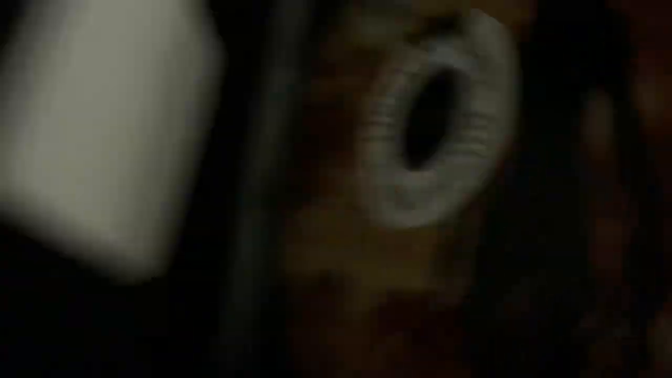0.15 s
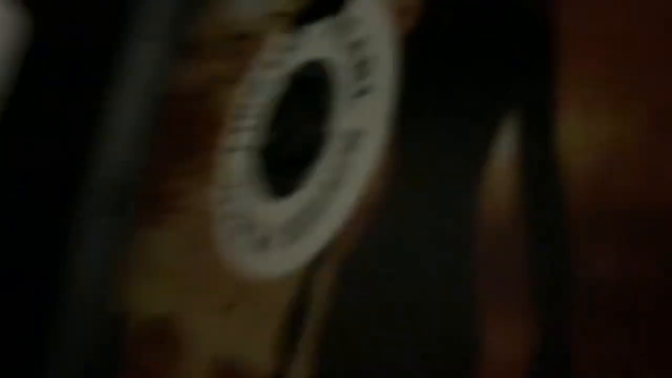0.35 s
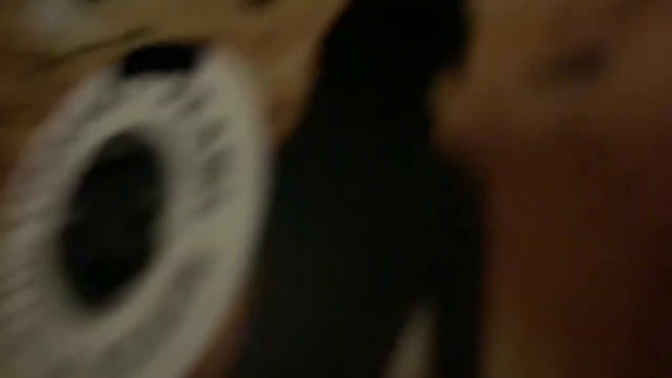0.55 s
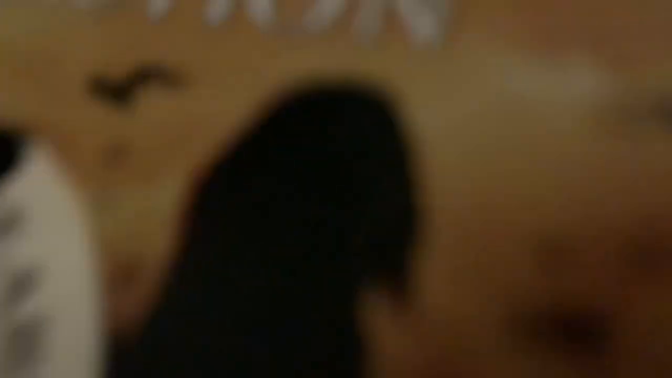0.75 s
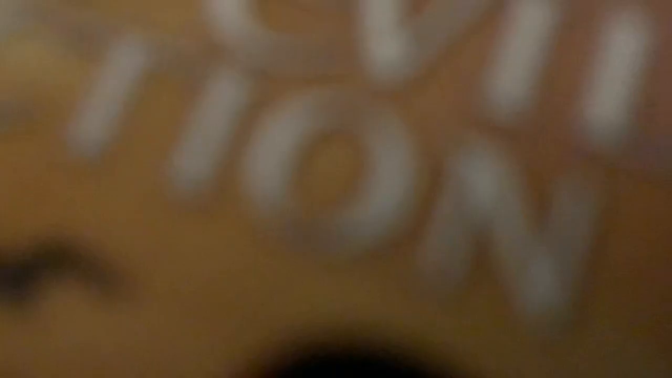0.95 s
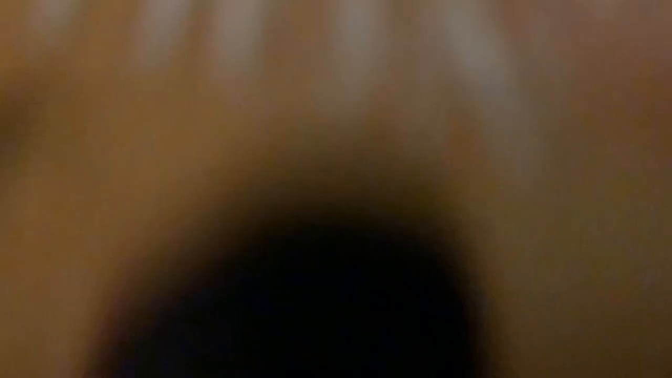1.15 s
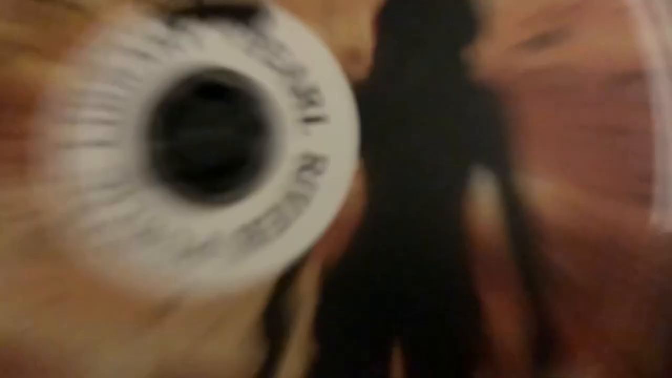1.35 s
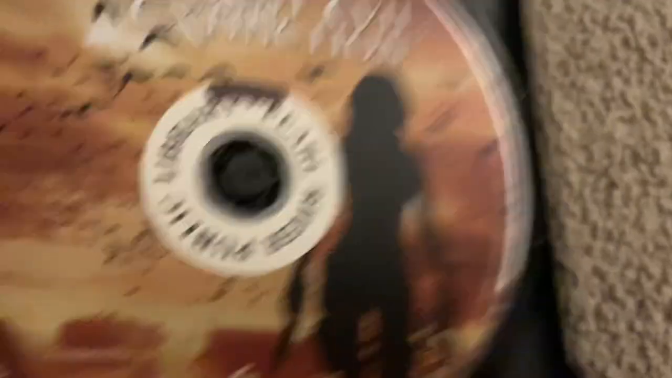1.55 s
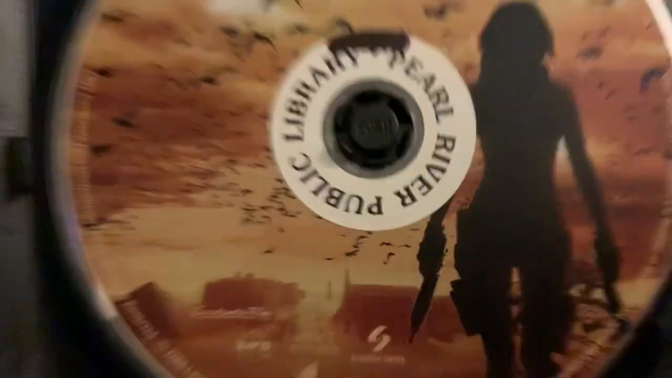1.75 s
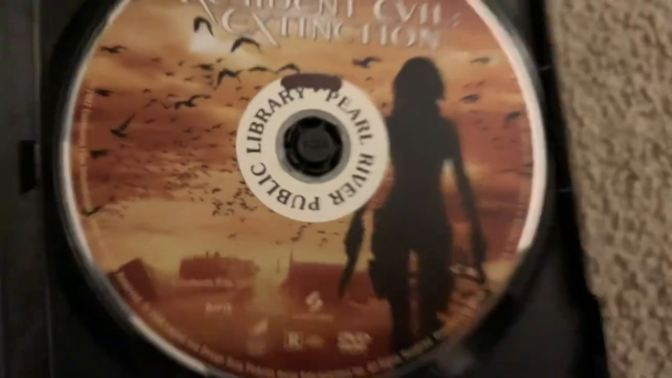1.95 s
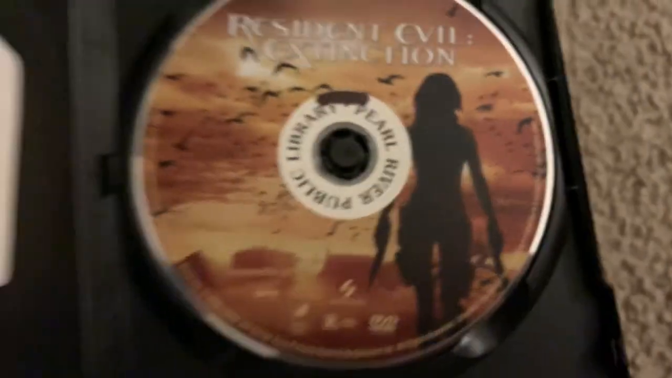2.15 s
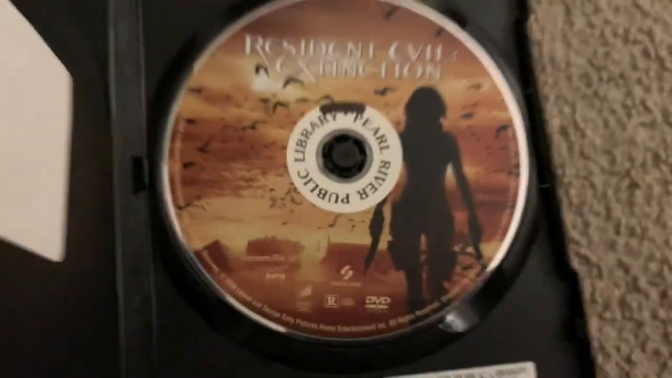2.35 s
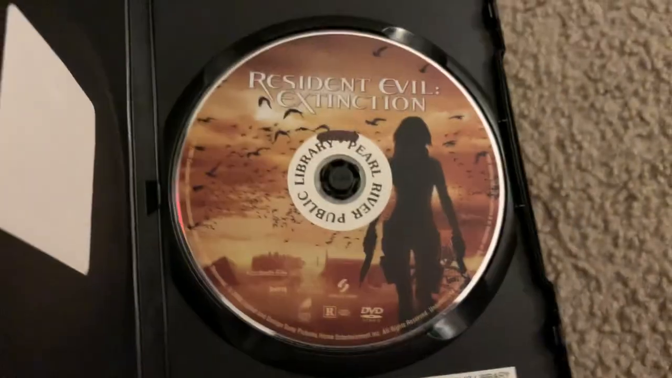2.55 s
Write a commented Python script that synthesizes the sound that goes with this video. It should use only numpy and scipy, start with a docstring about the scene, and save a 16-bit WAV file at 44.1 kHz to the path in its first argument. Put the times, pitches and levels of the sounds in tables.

```python
"""A grainy rub and a light clack open the take, right at the microphone in a small quiet room.
A plastic disc case lets its catch go: a run of clacks, noise bursts that ring the modes of the shell,
with soft thumps, short falling sines, and a brief tail from the room, decaying noise and one held note.
Then fingers shift their grip: bumps, light damped ticks and rubs of stick-slip noise.
Behind it all, steady noise makes the low rumble of the room."""
import sys
import numpy as np
from scipy import signal
from scipy.fft import rfft, irfft, next_fast_len
from scipy.io import wavfile

SR = 44100
rng = np.random.default_rng(int(sys.argv[2]) if len(sys.argv) > 2 else 0)


def bounce(signal):
    """Save signal as a 16-bit WAV file at the path given by the first command-line argument."""
    frames = np.transpose(np.atleast_2d(signal))
    limited = np.clip(frames, -1, 1)
    pcm = np.round(limited * 32767).astype(np.int16)
    wavfile.write(sys.argv[1], SR, pcm)


N = 114660  # 2.6 s
TIME = np.arange(N) / SR
BASS_HZ, MIDDLE_HZ, TREBLE_HZ = 450, 2370, 10800  # where the tone of a contact is set
ATTACK_S = 0.00057  # onset of clacks and ticks


def from_db(db):
    """Decibels to gain."""
    return 10 ** (np.asarray(db) / 20)


def at_hz(points, hz):
    """Read (frequency [Hz], value) points on a log-frequency axis."""
    points = np.array(points)
    return np.interp(np.log(hz + 1), np.log(points[:, 0]), points[:, 1])


def add(out, sound, s):
    """Mix a sound in at time s; what falls before the start or after the end is cut."""
    start = int(s * SR)
    sound = sound[..., max(-start, 0):]
    start = max(start, 0)
    out[..., start:start + sound.shape[-1]] += sound[..., :N - start]


def noise(spectra, likeness, size, balance=None):
    """Stereo random-phase noise with the summed spectra, as alike left and right as the likeness says."""
    hz = np.arange(size // 2 + 1) * SR / size
    mid, side = np.exp(2j * np.pi * rng.random((2, len(hz)))) * np.sqrt(size / 2)
    alike = np.clip(at_hz(likeness, hz), -1, 1)
    left_right = np.array([[1], [-1]])
    db = sum(at_hz(points, hz) for points in spectra)
    if balance is not None:
        db = db + left_right * at_hz(balance, hz) / 2
    stereo = np.sqrt(1 + alike) * mid + left_right * np.sqrt(1 - alike) * side
    return irfft(from_db(db) * stereo, size)


def tone(level_db, bass_db, treble_db):
    """Spectrum of one contact: its level, with more or less bass and treble."""
    return [(BASS_HZ, level_db + bass_db), (MIDDLE_HZ, level_db), (TREBLE_HZ, level_db + treble_db)]


def stick_slip(t, grain, slip_s):
    """Uneven force of a surface that catches and lets go, with a new random strength every slip."""
    force = np.interp(t / slip_s, np.arange(len(t)), rng.standard_normal(len(t)))
    return np.exp(grain * force - grain ** 2)


def resonance(x, hz, width_hz):
    """Two-pole resonance with gain 1 on top."""
    r = np.exp(-np.pi * width_hz / SR)
    feedback = [1, -2 * r * np.cos(2 * np.pi * hz / SR), r * r]
    return signal.lfilter(np.array([1, 0, -1]) * (1 - r * r) / 2, feedback, x + 1e-18)


def ringing(x, modes, spread_db=0):
    """A sound together with the modes that it rings, each a little stronger or weaker by chance."""
    out = x
    for (hz, width_hz, db), chance in zip(modes, rng.standard_normal(len(modes))):
        out = out + from_db(db + spread_db * chance) * resonance(x, hz, width_hz)
    return out


# Clacks of the catch, close up: (time [s], relative level [dB], bass [dB], treble [dB], contact t60 [s])
CLACK_EVENTS = [(0.002, -18, -10.5, -11.5, 0.059), (0.0695, -31, -4, -12.5, 0.045),
                (0.161, -36, 10, -8, 0.0088), (0.2254, -10.5, 10.5, -8.5, 0.11), (0.2337, 4.5, 5, 5, 0.024),
                (0.2372, -1.5, -3.5, -2, 0.028), (0.2412, 2, -1.5, -4.5, 0.024),
                (0.253, -2, -7.5, -21.5, .028), (0.2771, -5, -16.5, -1.5, 0.045),
                (0.283, -9, -2, -3.5, 0.036), (0.2911, -14, 8.5, -13, 0.035), (0.2972, -3.5, 1.5, 8, 0.03),
                (0.3028, 2, 1, 2, 0.014), (0.32, -20.5, -8.5, -7.5, 0.028), (0.3266, -6.5, -3, -19.5, .02),
                (0.3314, -4.5, -1.5, -3.5, 0.024), (0.339, -23.5, -14, -8, 0.073)]
# Colour of the shell before each clack's own tone: (frequency [Hz], level [dB per Hz])
SHELL_COLOUR = [(25, -50), (60, -22.5), (170, -0.5), (300, -1), (480, -9.5), (800, -11), (1200, -21),
                (1800, -19), (2600, -12.5), (3400, -23.5), (4300, -21), (5300, -26.5), (7200, -25),
                (10500, -27.5), (16000, -35)]
# Modes of the hollow shell: (frequency [Hz], width [Hz], gain [dB])
SHELL_RESONANCES = [(447, 45, 6), (834, 9.4, 0), (1040, 36, 3), (1407, 32, 6), (1692, 71, 6.5),
                    (1845, 35, 4.5), (2440, 45, 1), (2570, 70, 3.5), (3100, 42, 2), (4090, 70, 4),
                    (4470, 81, -3), (5200, 37, 1), (6490, 170, 3.5), (6700, 140, 0), (7470, 87, 5.5),
                    (9340, 180, 0.5), (10140, 190, 4), (11200, 140, 3), (15700, 130, 6)]
# Clacks at the two sides of the microphone: (frequency [Hz], left-right likeness [-1 to 1])
SHELL_LIKENESS = [(125, 0.97), (180, -0.28), (230, -0.88), (340, -0.88), (430, 0.94), (700, 0.99),
                  (1200, 0.91), (2600, 0.34), (4000, 0), (5500, .2), (7000, .8), (15000, 0.83)]
# Side the clacks lean to: (frequency [Hz], left minus right [dB])
SHELL_BALANCE = [(380, 0), (620, 5.5), (1200, 9.5), (2000, 4), (2700, 7), (4300, 0.5), (7500, 0.5),
                 (10500, 0)]
# Bands of the clacks that barely reach the right port: (frequency [Hz], width [Hz], depth [dB])
RIGHT_DIPS = [(8450, 1500, -17.5), (12300, 990, -11)]
CLACK_SAMENESS = 0.49  # share of the shell's dense ringing that is the same at every clack
CLACK_GRAIN, CLACK_SLIP_S = 0.4, 0.00048
SHIVER_DB, SHIVER_T60_S = -26, 0.072  # the loose shell keeps trembling after each clack
MODE_SPREAD_DB = 3.5  # each clack strikes the modes with strengths of its own


def clacks():
    """Each clack is a burst of tiny slips that dies quickly and rings the shell's modes in its own way."""
    out, t = np.zeros((2, N)), TIME[:8192]
    hz = np.fft.rfftfreq(len(t), 1 / SR)
    shared = noise([SHELL_COLOUR], SHELL_LIKENESS, len(t), SHELL_BALANCE)
    for s, level_db, bass_db, treble_db, t60 in CLACK_EVENTS:
        own = noise([SHELL_COLOUR], SHELL_LIKENESS, len(t), SHELL_BALANCE)
        dense = np.sqrt(CLACK_SAMENESS) * shared + np.sqrt(1 - CLACK_SAMENESS) * own
        dense = irfft(rfft(dense) * from_db(at_hz(tone(level_db, bass_db, treble_db), hz)))
        contact = from_db(-60 * t / t60)
        shiver = from_db(SHIVER_DB - 60 * t / SHIVER_T60_S)
        envelope = (1 - np.exp(-t / ATTACK_S)) * (contact + shiver)
        burst = envelope * stick_slip(t, CLACK_GRAIN, CLACK_SLIP_S) * dense
        add(out, ringing(burst, SHELL_RESONANCES, MODE_SPREAD_DB), s)
    for dip_hz, width_hz, db in RIGHT_DIPS:
        out[1] -= (1 - from_db(db)) * resonance(out[1], dip_hz, width_hz)
    return out


# Soft blows of hand and case: (time [s], peak level [dB], settled pitch [Hz], swell [s])
THUMP_EVENTS = [(0.0, -38, 67, 0.012), (0.2235, -22, 778, 0.0039), (0.23, -15, 139, 0.012),
                (0.242, -7, 77.2, 0.0088), (0.285, -19.5, 106, 0.0063), (0.31, -23, 65.5, 0.012),
                (0.334, -36, 380, 0.0061), (0.336, -35, 123.7, 0.016), (0.405, -45, 55.3, 0.044),
                (0.421, -32, 109.3, 0.013), (0.463, -41.5, 110, 0.01), (0.501, -46, 85, .018),
                (0.86, -29.5, 87.1, 0.0098), (0.8868, -33, 615, 0.0033), (0.89, -21, 119, 0.0049),
                (0.907, -29, 101.4, 0.006), (0.929, -33, 57.4, 0.0082), (0.984, -47, 57.6, 0.035),
                (1.0222, -44.5, 612, 0.0019), (1.0235, -35.5, 205, 0.0017), (1.037, -49.5, 135.6, 0.024),
                (1.04, -49, 41.5, 0.038), (1.183, -27, 201.6, 0.0033), (1.195, -40.5, 731, 0.0052),
                (1.196, -42.5, 251.4, 0.0094), (1.22, -51, 135.4, 0.026), (1.513, -59, 327.7, 0.0033)]
THUMP_SAG, THUMP_SAG_SWELLS = 0.97, 0.3  # extra pitch at the start (share), its decay time (swells)


def thumps():
    """A soft blow bends the case for a few heavily damped swings; the faster bending waves arrive first."""
    out, t = np.zeros(N), TIME[:8192]
    for s, db, hz, swell in THUMP_EVENTS:
        age = t / swell
        pitch = hz * (1 + THUMP_SAG * np.exp(-age / THUMP_SAG_SWELLS))
        envelope = (age * np.exp(1 - age)) ** 2
        add(out, from_db(db) * envelope * np.sin(2 * np.pi * np.cumsum(pitch) / SR), s)
    return out


# Light dry ticks of the fingers: (time [s], relative level [dB], bass [dB], treble [dB], t60 [s])
TICK_EVENTS = [(0.8555, -43, 16, -33, .02), (0.8641, -18.5, -4.5, -25, 0.011), (0.8853, -7, -36, -8, 0.011),
               (0.903, -23, -19.5, -22, 0.021), (1.0215, -26.5, 1.5, -39, 0.011),
               (1.1835, -38, 11, -10, 0.014), (1.1955, -25, 9, -19, 0.015), (1.2005, -38, 22, -25, 0.0072),
               (1.2076, -41, 6, -17, 0.013)]
# Colour of a tick before its own tone: (frequency [Hz], level [dB per Hz])
TICK_COLOUR = [(100, -16), (800, -8.5), (1400, -21.5), (2400, -18.5), (3200, -19), (4200, -16),
               (5500, -27.5), (7200, -25), (16000, -45)]
# Side the ticks lean to: (frequency [Hz], left minus right [dB])
TICK_SIDES = [(400, -5.5), (1000, 4.5), (1500, 15), (2300, 11.5), (4000, 11), (5800, 0)]
# Modes of the held case: (frequency [Hz], width [Hz], gain [dB])
HELD_CASE_MODES = [(568, 32, 12), (746.5, 45, 19), (971.4, 60, 11.5), (1390, 55, 10.5), (2296, 170, 4.5),
                   (3150, 150, 1), (4110, 227, 3.5)]
# Ticks, rubs, room and floor at the microphone: (frequency [Hz], left-right likeness [-1 to 1])
COMMON_LIKENESS = [(150, 1), (500, 1), (1100, .7), (2200, 0.22), (5000, .4), (7500, .85), (11000, 1),
                   (15000, 0.93)]


def ticks():
    """Small contacts, damped at once by the hand that holds the plastic."""
    out, t = np.zeros((2, N)), TIME[:4096]
    for s, level_db, bass_db, treble_db, t60 in TICK_EVENTS:
        force = (1 - np.exp(-t / ATTACK_S)) * from_db(-60 * t / t60)
        spectra = [TICK_COLOUR, tone(level_db, bass_db, treble_db)]
        add(out, force * noise(spectra, COMMON_LIKENESS, len(t), TICK_SIDES), s)
    return ringing(out, HELD_CASE_MODES)


# Fingers sliding on plastic: (start [s], swell [s], fade [s], relative level [dB], bass [dB], treble [dB])
RUB_EVENTS = [(-0.06, 0.064, 0.11, 6.5, -1.5, -2.5), (0.061, 0.047, 0.14, -10, -5.5, -0.5),
              (0.194, 0.061, 0.0072, 1.5, 19, -3), (0.41, 0.054, 0.11, -4.5, 0.5, -12.5),
              (0.55, 0.072, 0.13, -16.5, 4, -1), (0.69, 0.046, 0.1, -17, 3, -1),
              (0.828, 0.034, 0.024, 5.5, 4, -14), (0.872, 0.02, 0.077, -2, 9, -5.5),
              (0.92, 0.1, 0.094, -5.5, -1, -10.5), (1.096, 0.044, 0.079, 2, 8, -20.5),
              (1.11, 0.048, 0.044, -19, 7, 25.5), (1.178, 0.019, 0.023, -6.5, 19.5, -10),
              (1.199, 0.01, 0.13, -17, 5.5, -7.5), (1.96, 0.04, 0.06, -18, -7, 2.5),
              (2.025, 0.028, 0.04, -16, -5, 0)]
# Colour of a rub before its own tone: (frequency [Hz], level [dB per Hz])
RUB_COLOUR = [(20, -75), (50, -57.5), (150, -33.5), (350, -43.5), (700, -41.5), (1100, -52.5), (1600, -54),
              (2150, -49.5), (3200, -58), (4100, -57), (6000, -65), (9000, -63.5), (11300, -66),
              (13200, -60.5), (15500, -65)]
# Side the rubs lean to: (frequency [Hz], left minus right [dB])
RUB_SIDES = [(700, -1), (2200, 6), (3500, 3.5), (5500, 0)]
RUB_GRAIN, RUB_SLIP_S = 0.4, 0.0022  # unevenness of a rub and length of one slip


def rubs():
    """Skin drags over the plastic in short grainy strokes."""
    out, t = np.zeros((2, N)), TIME[:16384]
    for s, swell, fade, level_db, bass_db, treble_db in RUB_EVENTS:
        stroke = np.interp(t, [0, swell, swell + fade], [0, np.pi / 2, np.pi])
        pressure = np.sin(stroke) ** 2
        spectra = [RUB_COLOUR, tone(level_db, bass_db, treble_db)]
        drag = noise(spectra, COMMON_LIKENESS, len(t), RUB_SIDES)
        add(out, pressure * stick_slip(t, RUB_GRAIN, RUB_SLIP_S) * drag, s)
    return out


# Answer of the small room: (frequency [Hz], level [dB], t60 [s])
ROOM_ANSWER = [(60, -23, 0.97), (122.27, -7, 1), (250, -21.5, 1), (495, -13.5, 0.85), (982.5, -17, 0.9),
               (2200, -23, 0.7), (4600, -20, 0.4), (8991, -32, 0.66), (16000, -33.5, 0.38)]
ROOM_BUILD_S = 0.0067


def room(x):
    """A dull diffuse tail, noise that dies at its own rate in each octave."""
    table, t = np.array(ROOM_ANSWER), TIME[:SR]
    air, answer = noise([table[:, :2]], COMMON_LIKENESS, len(t)), 0
    edges = 40 * 2. ** np.arange(10)  # octaves
    for low, high in zip(edges, edges[1:]):
        t60 = at_hz(table[:, ::2], np.sqrt(low * high))
        band = signal.sosfilt(signal.butter(2, [low, high], "band", fs=SR, output="sos"), air)
        same_energy = np.sqrt(2 * np.log(1000) / (t60 * SR))  # a longer tail is made quieter
        answer = answer + band * from_db(-60 * t / t60) * same_energy
    return signal.fftconvolve(x, answer * (1 - np.exp(-t / ROOM_BUILD_S)), axes=1)[:, :N]


RING_S, RING_HZ, RING_T60_S, RING_DB = 0.34, 525, 0.61, -47.5  # start, pitch, decay, level at the start


def held_note():
    """One note hangs on after the clacks, a decaying sine."""
    age = np.maximum(TIME - RING_S, 0)
    return from_db(RING_DB - 60 * age / RING_T60_S) * np.sin(2 * np.pi * RING_HZ * age)


# Bands that stand out of the clacks' tail: (frequency [Hz], width [Hz], gain [dB])
TAIL_MODES = [(880, 60, -2), (2200, 170, 6), (4020, 240, 11), (6300, 200, 1)]
DAMP_S, DAMP_FALL_S, DAMP_DB = 0.526, 0.03, -5.5  # the lingering ring drops: when, how fast, how far
THUMP_ROOM_DB = -4


def tail(plastic, blows):
    """The room answers the left side of the clacks and the blows; the clacks' ring drops in level."""
    damping = from_db(np.interp(TIME, [DAMP_S, DAMP_S + DAMP_FALL_S], [0, DAMP_DB]))
    clack_tail = ringing(room(plastic[:1]), TAIL_MODES)
    return damping * (held_note() + clack_tail) + from_db(THUMP_ROOM_DB) * room(blows[None])


# Steady background of the quiet room: (frequency [Hz], level [dB per Hz])
FLOOR_COLOUR = [(20, -59.5), (35, -44.5), (70, -39.5), (130, -47), (280, -60.5), (550, -69.5),
                (1100, -74.5), (2400, -77), (5500, -85), (11000, -82.5), (14000, -84), (16000, -100)]


def room_floor():
    """Low room rumble, steady noise strongest in the bass."""
    return noise([FLOOR_COLOUR], COMMON_LIKENESS, N)


def scene():
    """Case and fingers close by, the room behind them."""
    plastic, blows = clacks(), thumps()
    return plastic + blows + ticks() + rubs() + tail(plastic, blows) + room_floor()


# The left side of the microphone hears the treble late: (frequency [Hz], lag [ms])
LEFT_SIDE_LAG = [(600, 0), (1200, .1), (2600, .2), (4100, .23), (6300, .16), (8500, .176), (15500, .193)]
LOW_CUT_HZ, CUTOFF_HZ = 38, 16200


def record(dry):
    """The left side lags a little in the treble; the deepest bass and the top are cut off."""
    low_cut = signal.butter(3, LOW_CUT_HZ, "high", fs=SR, output="sos")
    left, right = signal.sosfilt(low_cut, dry)
    size = next_fast_len(2 * N)
    hz = np.fft.rfftfreq(size, 1 / SR)
    lag_s = at_hz(LEFT_SIDE_LAG, hz) / 1000
    left = irfft(rfft(left, size) * np.exp(-2j * np.pi * hz * lag_s), size)[:N]
    top_cut = signal.ellip(10, .3, 70, CUTOFF_HZ, fs=SR, output="sos")
    return signal.sosfilt(top_cut, np.array([left, right]))


dry = scene()
out = record(dry)
bounce(out)
```